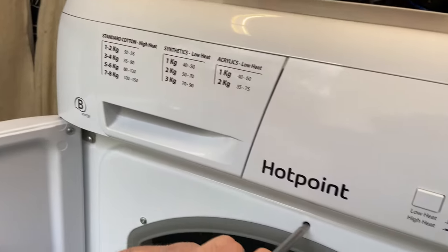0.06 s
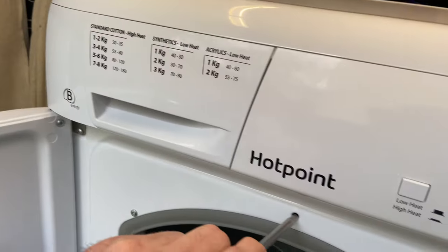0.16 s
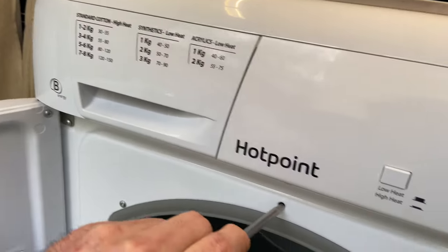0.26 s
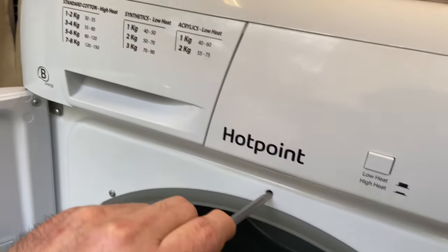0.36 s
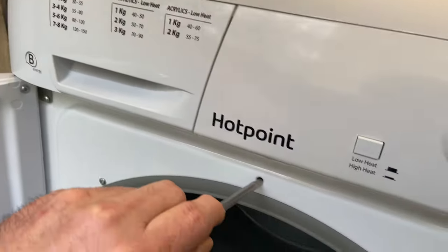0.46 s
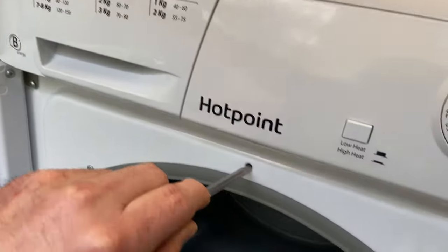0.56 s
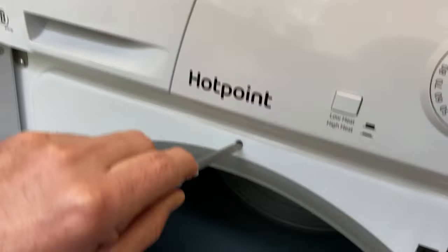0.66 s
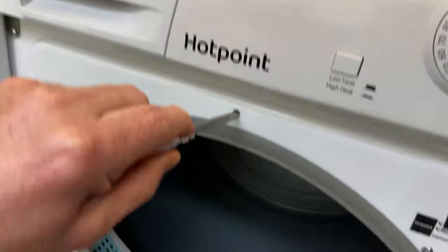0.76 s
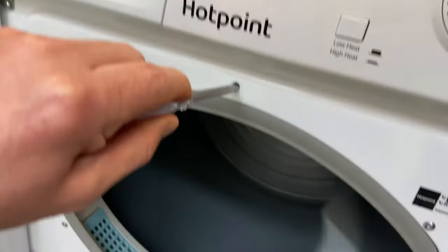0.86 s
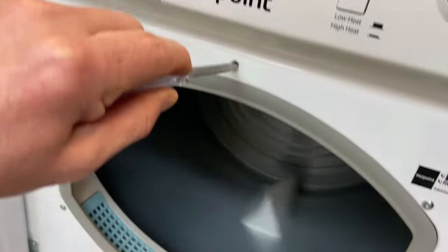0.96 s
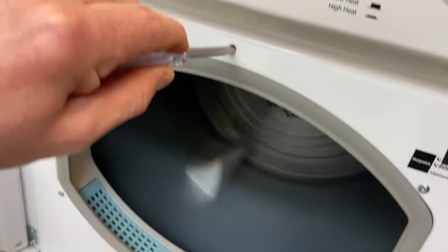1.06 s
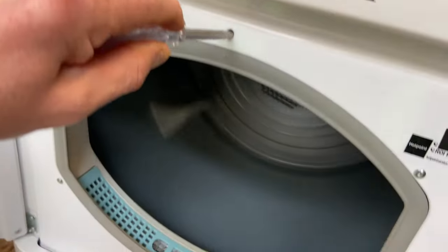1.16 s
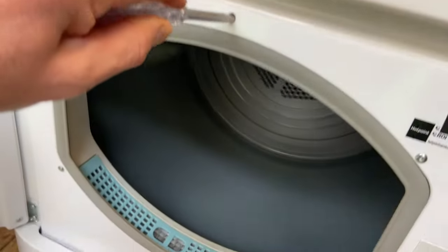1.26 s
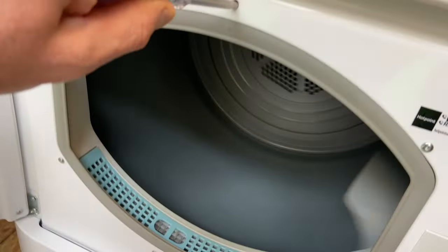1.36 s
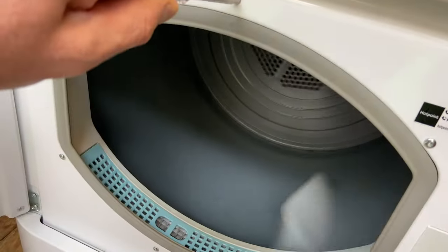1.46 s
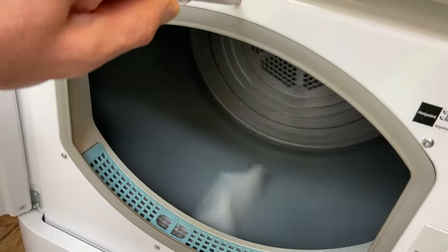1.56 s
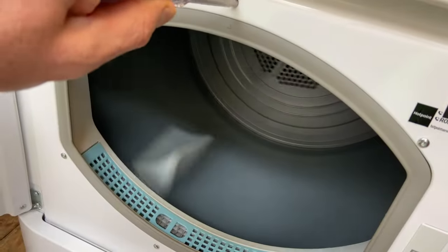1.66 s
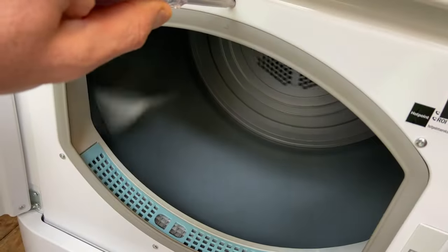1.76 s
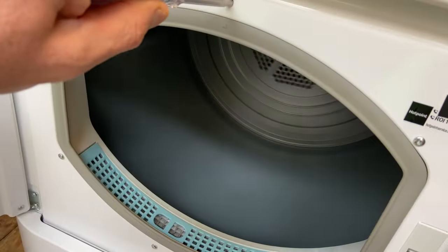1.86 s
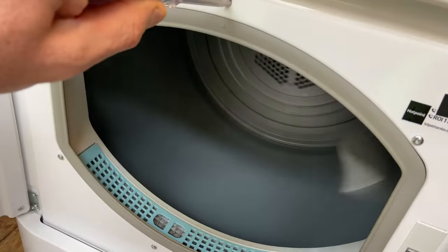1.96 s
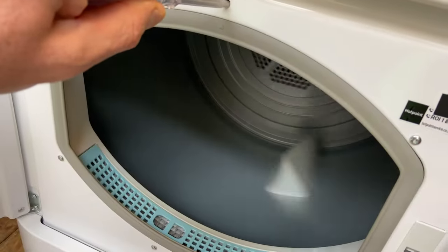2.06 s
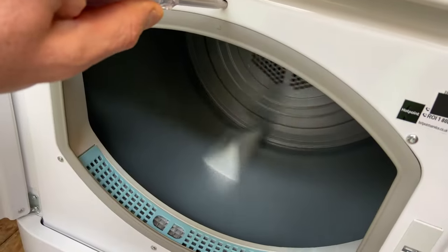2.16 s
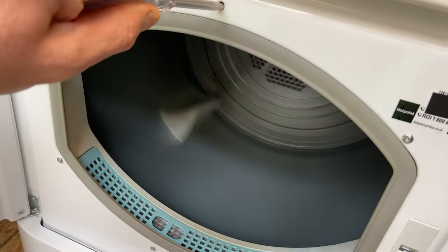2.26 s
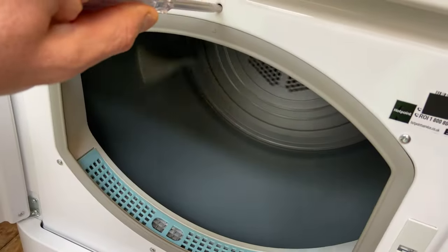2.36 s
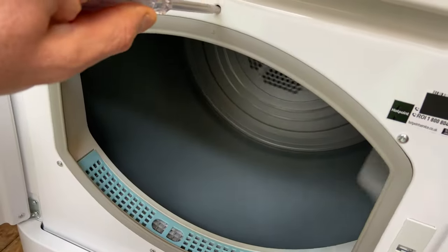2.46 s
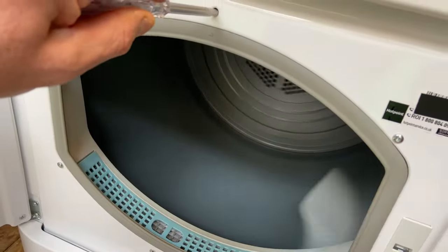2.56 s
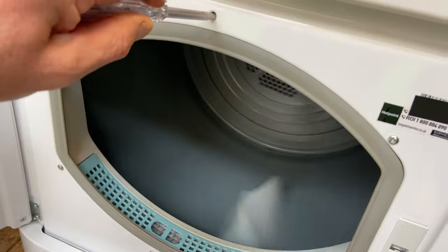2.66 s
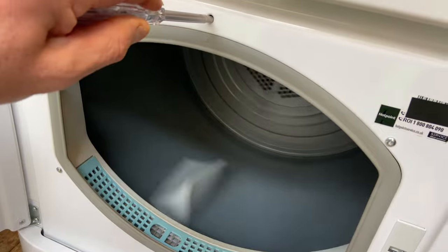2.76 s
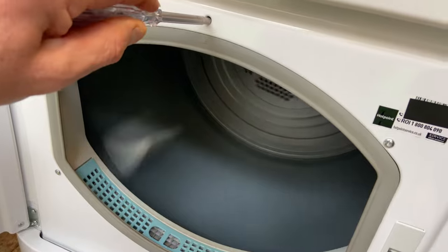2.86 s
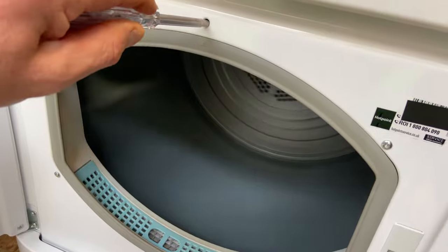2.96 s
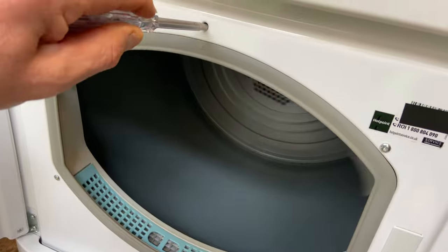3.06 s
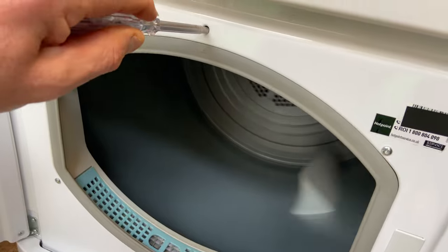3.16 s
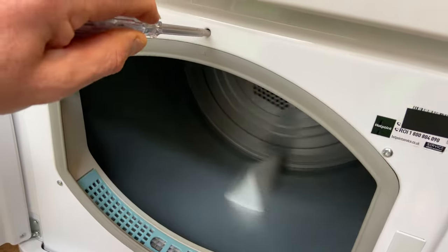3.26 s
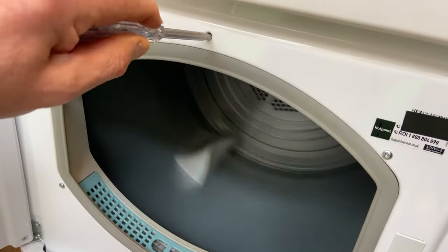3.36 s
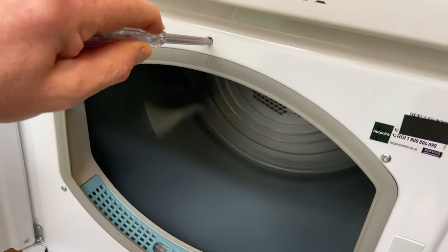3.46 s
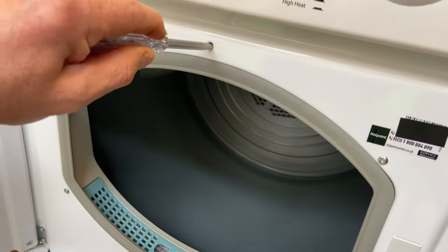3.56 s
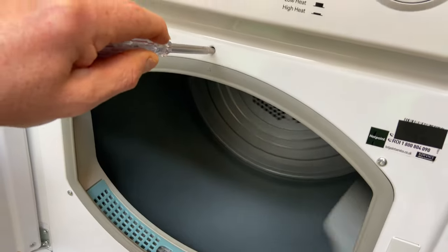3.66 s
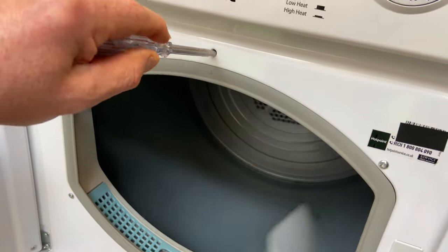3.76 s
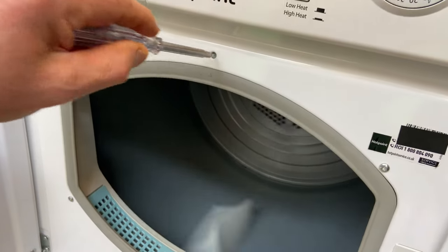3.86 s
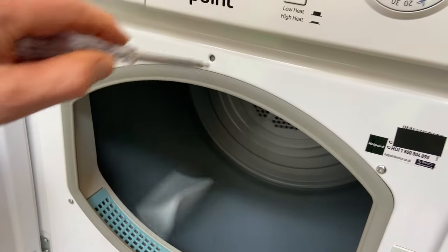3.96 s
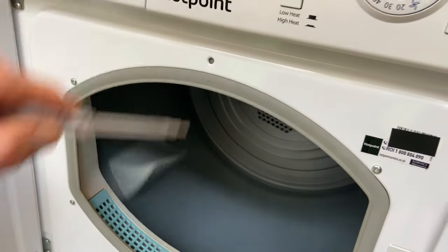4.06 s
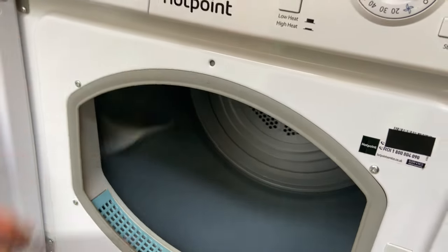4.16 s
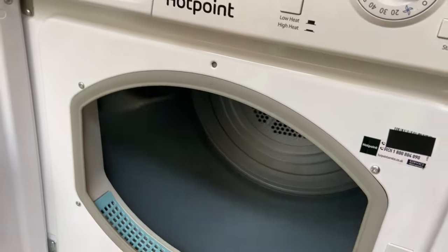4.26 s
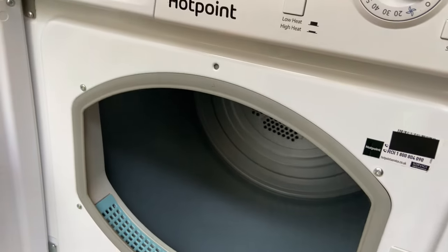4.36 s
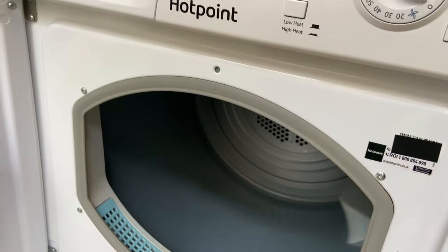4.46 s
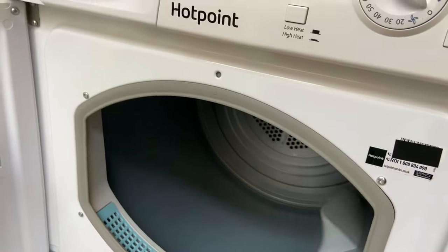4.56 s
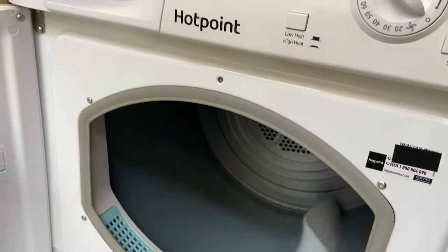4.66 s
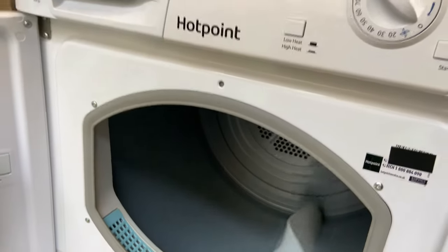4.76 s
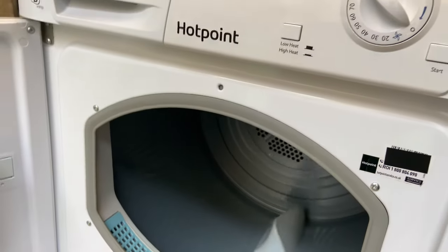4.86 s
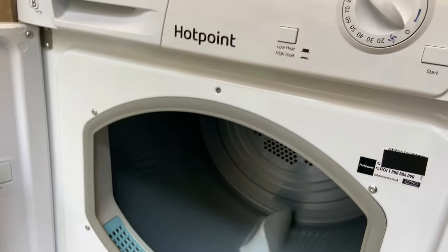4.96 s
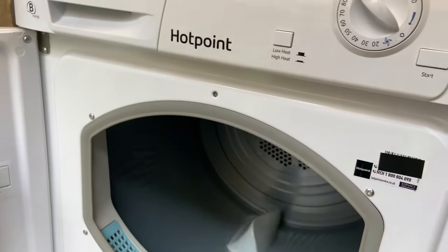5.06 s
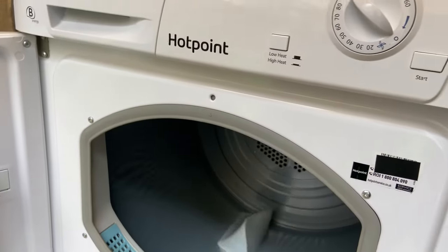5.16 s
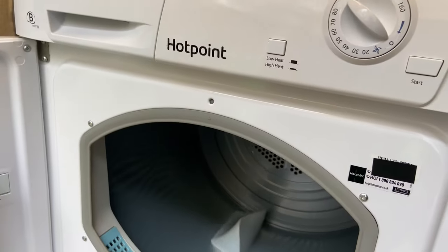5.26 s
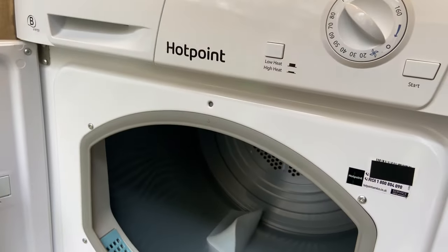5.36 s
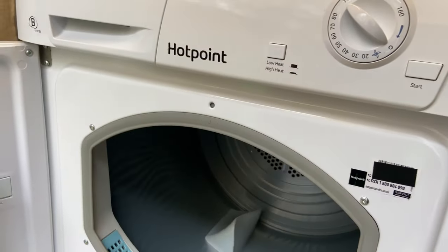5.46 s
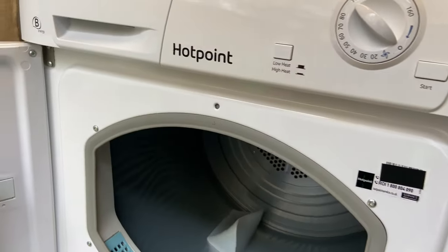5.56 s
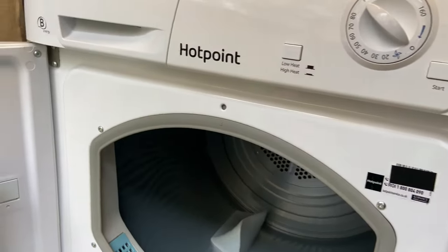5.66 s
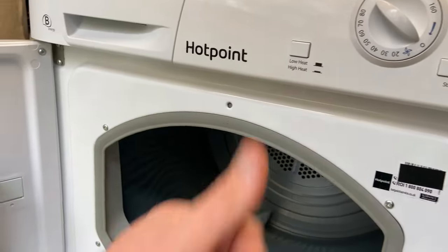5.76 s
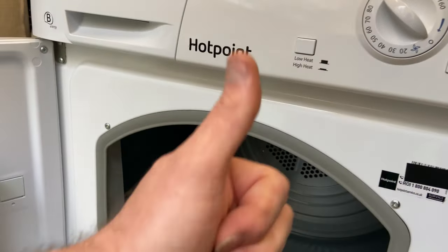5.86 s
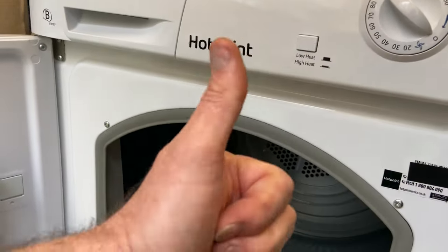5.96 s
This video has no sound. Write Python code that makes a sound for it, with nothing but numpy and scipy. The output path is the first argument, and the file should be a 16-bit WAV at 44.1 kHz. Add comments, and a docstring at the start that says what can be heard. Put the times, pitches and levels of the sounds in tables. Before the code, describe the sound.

Steady dryer drone with airy whoosh and drum rumble, a tiny squeak, a quick run-down, then a loud clack and rattling thuds into quiet.

```python
"""An empty tumble dryer runs with its door open, the door switch held in by a screwdriver, in a small room.
The motor hums, its fan drives air through the drum, and the drum rumbles and rubs on its seals.
The microphone pair moves from the control panel to the door. The screwdriver squeaks off and all coasts down;
a sharp clack, likely the motor's centrifugal switch, shakes the cabinet, with knocks and low bumps as the drum
settles. Sources are modulated sines, shaped noise and struck resonances over a quiet room tone."""
import sys
import numpy as np
from scipy import signal
from scipy.fft import rfft, irfft
from scipy.io import wavfile

SR = 44100
rng = np.random.default_rng(int(sys.argv[2]) if len(sys.argv) > 2 else 0)


def to_wav(s):
    """Save 16-bit WAV."""
    ch = np.atleast_2d(s).T  # columns
    pcm = np.round(np.clip(ch, -1, 1) * 32767)  # PCM
    wavfile.write(sys.argv[1], SR, pcm.astype(np.int16))


N = 264600
TIME = np.arange(N) / SR
BINS = np.maximum(np.fft.rfftfreq(N, 1 / SR), 1)
LEFT_RIGHT = np.array([[.5], [-.5]])  # times a difference in dB, splits it between the channels

# quiet room, spectrum: pitch_hz, density_db [dB per Hz]
ROOM_TONE_SPECTRUM = [(20, -3.5), (35, 1), (55, 5.5), (85, -3.5), (140, -6), (220, -8.5), (300, -19),
                      (480, -24), (1050, -26.5), (2000, -38.5), (4000, -56.5), (16000, -68)]
# likeness of the two microphone channels: pitch_hz, likeness [0-1]
CHANNEL_LIKENESS = [(60, 0.9), (130, 0.99), (290, 0.8), (640, 0.66), (1410, 0.55), (3100, 0.44),
                    (4400, 0.58), (5600, .1), (7000, 0.17)]
# low bumps: a deep thud as the machine slows, then swells as the drum rocks to rest: start_s, level_db,
# pitch_hz
LOW_BUMPS = [(4.612, -36.5, 76), (5.105, -49, 185), (5.14, -50, 183), (5.19, -42.5, 179.5),
             (5.425, -43.5, 181), (5.637, -42, 180), (5.828, -44, 186.5)]
# knocks on the cabinet: start_s, level_db, pitch_hz [of the push]
CABINET_KNOCKS = [(4.7218, -17.5, 397), (4.724, -10.5, 236), (4.7403, -20, 275), (4.748, -22, 260),
                  (4.76, -29, 260), (4.8134, -11.5, 219), (4.834, -32, 270), (4.851, -19, 193),
                  (4.876, -24.5, 152), (4.921, -25.5, 205), (4.941, -30, 190), (4.9842, -37, 250),
                  (4.9878, -25.5, 204), (5.003, -31, 230), (5.011, -30, 232), (5.0462, -27, 222),
                  (5.066, -36, 245), (5.075, -36, 215)]
# cabinet panel modes: pitch_hz, level_db, t60_s
PANEL_MODES = [(128, -20, .13), (165, -16.5, .15), (197, -23, .13), (250, -15, .165), (404, -1, .11),
               (440, -8, .08), (515, -20, .08), (560, -21, .08), (685, -20, .09)]
# touches of a loose spring: start_s, level_db
SPRING_JOLTS = [(4.728, -57), (4.815, -55), (4.827, -55), (4.926, -59), (4.932, -58), (4.94, -60)]
# loose spring modes: pitch_hz, level_db, t60_s
SPRING_MODES = [(3704, -4, .07), (3880, -5, .06), (4260, -7, .05), (4960, 1, .1), (5080, -4, .07),
                (7340, -11, .07), (7600, -7, .07), (9555, -8, .06), (11860, -10, .05), (14200, -9, .04),
                (15050, -7, .06)]
# hard metal contacts: start_s, ring_db, crack_db, edge_hz [upper edge of the crack]
METAL_CONTACTS = [(3.8089, -67, -22, 12000), (4.72, -46, -23.5, 15300), (4.7207, -20.5, -24, 6000),
                  (4.7256, -32, -27, 4000), (4.734, -49, -33, 2500), (4.7455, -55, -37, 2500),
                  (4.766, -48, -42, 2500), (4.8093, -52, -28, 4000), (4.8125, -54, -37, 4000),
                  (4.8463, -70, -31, 5500), (4.9215, -58, -55, 1490), (4.981, -70, -45, 4000),
                  (4.9865, -80, -38.5, 9000), (5.044, -55, -41, 1200)]
# metal crack, spectrum: pitch_hz, density_db [dB per Hz]
CRACK_SPECTRUM = [(150, 4), (500, 9), (750, 7), (1100, 17.5), (1500, 6), (2300, 15), (2900, 0.5),
                  (3400, 5.5), (4400, 6), (5600, 1.5), (6300, -9), (7400, 3.5), (8600, -4), (10000, 7),
                  (12000, -8), (15500, 2)]
# switch and bracket modes: pitch_hz, level_db, t60_s
BRACKET_MODES = [(700, -28, .05), (942, -11, .045), (1000, -3.5, .032), (1066, -15, .045), (1140, -1, .026),
                 (1265, -9, .023), (1480, -21, .04), (1803, -23, .06), (2062, -21, .07), (2170, -23, .05),
                 (2283, -17, .09), (2400, -24, .05), (2580, -24, .06), (3300, -27, .04), (4091, -28, .06),
                 (4750, -29, .04), (5560, -26, .04)]
# small hard part's modes: pitch_hz, level_db, t60_s
TICK_MODES = [(1560, 1, 0.031), (1690, 2, .025), (1810, 0, .03), (2270, -8, .06), (2525, -17, .06)]
# dry brushing, spectrum: pitch_hz, density_db [dB per Hz]
BRUSH_SPECTRUM = [(600, -17), (1600, 7.5), (2800, 4.5), (4400, 3), (5800, -4), (7400, -4.5), (11000, -11),
                  (15500, -12)]
# drum on its bearings, spectrum: pitch_hz, density_db [dB per Hz]
RUMBLE_SPECTRUM = [(20, -41), (36, -23), (48, -6.5), (66, -8.5), (80, 1.5), (105, -1.5), (145, 2),
                   (185, -3.5), (215, -7.5), (265, -8), (310, -13), (600, -48.5)]
# air rush, spectrum: pitch_hz, density_db [dB per Hz]
AIR_SPECTRUM = [(120, -34), (240, -7.5), (340, 0), (450, 0), (700, -2), (920, -5), (1250, -8),
                (1700, -11.5), (2300, -17.5), (3200, -21.5), (6000, -50), (16000, -65)]
# rubbing of seals and other dry contacts, spectrum: pitch_hz, density_db [dB per Hz]
RUB_SPECTRUM = [(400, -26), (1500, 2), (2500, 1.5), (3200, 4), (4400, 2), (5800, -4), (7000, -1),
                (8300, -6), (11000, -7.5), (15500, -14)]
# resonances and hollows of drum and air duct: pitch_hz, width_hz, level_db, left_minus_right_db
DUCT_RESONANCES = [(308, 17, -12.5, 4), (357, 78, 2, 1), (493.7, 54, -9.5, -10.5), (534, 55, 1.5, 10),
                   (609, 86, -3, -6.5), (716, 39, -6, 13.5), (784, 104, 2, 2.5), (900, 150, 2, 1.5),
                   (998, 70, -8.5, 0), (1088, 63, 3, 2.5), (1297, 100, -4.5, 3), (1434, 125, 3.5, -2.5),
                   (1996, 40, 4.5, 7), (2030, 57, -1, -4), (2260, 74, -0.5, 17), (2825, 54, 1, 12.5)]
# high spots of the drum's rim: first_pass_s, length_s, added_db
RIM_HIGH_SPOTS = [(0.287, 0.044, 2.5), (0.52, 0.0076, 4), (.85, 0.11, 0.9)]
# motor and fan orders: order [multiple of the shaft rate], level_db, roughness [0-1]
SHAFT_ORDERS = [(1, -47.5, .4), (2, -25.4, 0.05), (12, -52, .6), (17, -46.5, .6), (18, -48, .5),
                (19, -51, .5), (20, -48.5, .5), (24, -44, 0.6), (30, -53.5, .5), (31, -51.5, .5),
                (32, -53, .5), (33, -53, .5)]

# steady shaft rate, moment the door switch opens, length of the coast to rest
SHAFT_HZ, SWITCH_OFF_S, COAST_S = 45.24, 3.8, 1.69
FIELD_DECAY_S = 0.04  # the motor's magnetic pull dies away once the current is cut
APPROACH_S = 0.95  # the microphone's move from the control panel to the open door
DRUM_TURN_S = 1.14  # at full speed
SLACK_DB = -1.5  # drop of rush and rubbing when the belt stops pulling
RIPPLE_DB = 1.7


def from_db(db):
    """Decibels to gain."""
    return 10 ** (np.asarray(db) / 20)


def rms_one(x):
    """Scale so that the middle of the stereo picture has rms 1."""
    middle = np.atleast_2d(x).mean(0)
    return x / np.sqrt(np.mean(middle ** 2) + 1e-20)


def over_hz(points):
    """Join (Hz, value) points on a log-frequency axis."""
    hz, value = np.transpose(points)
    return np.interp(np.log(BINS), np.log(hz), value)


def drift(rate_hz):
    """Slow random wander of rms 1, changing about rate_hz times a second."""
    spectrum = rfft(rng.standard_normal(N))
    return rms_one(irfft(spectrum / (1 + (BINS / rate_hz) ** 2) ** 1.5, N))


def noise(colour_db):
    """Coloured stereo noise, more alike in the bass and more diffuse in the treble; its middle has rms 1."""
    mid, side = rfft(rng.standard_normal((2, N)))
    alike = np.clip(over_hz(CHANNEL_LIKENESS), 0, .999)
    pair = mid + np.sqrt((1 - alike) / (1 + alike)) * side * 2 * LEFT_RIGHT
    return rms_one(irfft(pair * from_db(colour_db), N))


def clicks(times_s, levels_db):
    """One impulse at each time."""
    out = np.zeros(N)
    out[np.round(np.asarray(times_s) * SR).astype(int)] = from_db(levels_db)
    return out


def ring(force, modes):
    """A unit impulse sets every (Hz, dB, t60) mode ringing, with alternating signs."""
    t = TIME[:SR // 2]
    response = np.zeros(len(t))
    for k, (hz, level_db, t60) in enumerate(modes):
        response += (-1) ** k * from_db(level_db - 60 * t / t60) * np.sin(2 * np.pi * hz * t)
    return signal.fftconvolve(force, response)[:N]


def speed():
    """Share of full speed: 1 under power, then friction brakes it evenly to 0."""
    return np.clip(1 - (TIME - SWITCH_OFF_S) / COAST_S, 0, 1)


def pull():
    """Share of the motor's magnetic pull: 1 under current, dying quickly after the switch opens."""
    return np.exp(-np.maximum(TIME - SWITCH_OFF_S, 0) / FIELD_DECAY_S)


def shade(level_db):
    """Gain that starts at level_db and rises to 0 dB as the microphone reaches the door."""
    return from_db(level_db * np.clip(1 - TIME / APPROACH_S, 0, 1))


def run_down(power, drag_db, drag_power=0.74):
    """Gain of a noise driven by the speed: a steep part and a light drag that lasts until standstill."""
    return np.hypot(speed() ** power, from_db(drag_db) * speed() ** drag_power)


def ripple(spacing_hz):
    """Many overlapping modes ripple the upper spectrum, differently in each channel; in dB."""
    knots_hz = np.arange(2000) * spacing_hz
    rows = rng.standard_normal((2, len(knots_hz)))
    heights = np.array([np.interp(BINS, knots_hz, row) for row in rows])
    return RIPPLE_DB * heights * over_hz([(1000, 0), (2000, 1)])


def room_tone(level_db=-48, right_minus_left_db=1.0):
    """The quiet room is a steady noise, strongest in the bass."""
    return from_db(level_db - right_minus_left_db * LEFT_RIGHT) * noise(over_hz(ROOM_TONE_SPECTRUM))


def reflections(x, t60_s=0.2, onset_s=0.0043):
    """Dense reflections from the drum and the near walls, building up and dying away."""
    t = TIME[:SR // 2]
    white = noise(0 * BINS)[:, :len(t)]
    tail = white * from_db(-60 * t / t60_s) * (1 - np.exp(-t / onset_s))
    tail /= np.sqrt(np.sum(tail.mean(0) ** 2))
    return signal.fftconvolve(x, tail, axes=1)[:, :N]


def low_bumps(rise_s=.023, tail_db=-17, tail_s=.12):
    """Dull swells, each of one low note that lingers faintly: a deep thud as the machine slows, then the drum
    rocking to rest."""
    out = np.zeros(N)
    for start_s, level_db, hz in LOW_BUMPS:
        t = np.maximum(TIME - start_s, 0)
        age = t / rise_s
        swell = age ** 2 * np.exp(2 - 2 * age)
        lingering = from_db(tail_db) * (1 - np.exp(-age)) * np.exp(-t / tail_s)
        out += from_db(level_db) * (swell + lingering) * np.sin(2 * np.pi * hz * t)
    return out


def cabinet_knocks(cycles=0.44, sag=0.082, panel_db=-42):
    """Each knock flexes the cabinet for two or three cycles and leaves its panels ringing."""
    flex = np.zeros(N)
    for start_s, level_db, hz in CABINET_KNOCKS:
        # bending waves carry the higher pitches faster, so the thud sags in pitch
        phase = np.log1p(sag * hz * np.clip(TIME - start_s, 0, 1)) / sag
        age = phase / (2 * cycles)
        push = age ** 2 * np.exp(2 - 2 * age)
        flex -= from_db(level_db) * push * np.sin(2 * np.pi * phase)
    # the panels are too small to radiate deep bass
    radiated = signal.sosfilt(signal.butter(2, 70, "high", fs=SR, output="sos"), flex)
    return radiated + from_db(panel_db) * ring(flex, PANEL_MODES)


def loose_spring(scrape_db=4, scrape_s=0.0046):
    """The harder knocks jolt a loose spring: each touch scrapes briefly and sets it ringing."""
    jolts = clicks(*np.transpose(SPRING_JOLTS))
    contact = signal.lfilter([1], [1, -np.exp(-1 / (scrape_s * SR))], jolts)
    scrape = from_db(scrape_db) * contact * noise(over_hz(RUB_SPECTRUM))
    return ring(jolts, SPRING_MODES) + scrape


def screwdriver_squeak(start_s=3.745, length_s=0.067, edge_s=0.0084, pitch_hz=2440, waver_hz=70):
    """Sliding off the switch, steel sticks and slips on plastic: a short unsteady note and a scrape."""
    phase = 2 * np.pi * np.cumsum(pitch_hz + waver_hz * drift(137)) / SR
    to_nearest_end = np.minimum(TIME - start_s, start_s + length_s - TIME)
    sliding = np.clip(to_nearest_end / edge_s, 0, 1)
    note = from_db(-43) * np.sin(phase)
    scrape = from_db(-41.5) * noise(over_hz(RUB_SPECTRUM))
    return sliding * (note + scrape)


def metal_clacks(crack_s=0.0029, tail_db=-15, tail_s=0.0087, tick_s=4.9865, tick_db=-45.5):
    """Metal snaps on metal: a crack with a rattling tail, duller if softer; bracket and a small part ring."""
    grit = noise(over_hz(CRACK_SPECTRUM)) * from_db(-5.5 + 5.5 * LEFT_RIGHT)
    t = TIME[:SR // 5]
    decay = np.exp(-t / crack_s) + from_db(tail_db) * np.exp(-t / tail_s)
    cracks = np.zeros((2, N))
    for start_s, _, crack_db, edge_hz in METAL_CONTACTS:
        at = round(start_s * SR)
        burst = grit[:, at:at + len(t)] * decay
        dulled = signal.lfilter(*signal.butter(1, edge_hz, fs=SR), burst)
        cracks[:, at:at + len(t)] += from_db(crack_db) * dulled
    times_s, ring_db = np.transpose(METAL_CONTACTS)[:2]
    bracket = ring(clicks(times_s, ring_db), BRACKET_MODES)
    # the small part ticks with one of the last knocks
    tick = ring(clicks([tick_s], [tick_db]), TICK_MODES)
    return cracks + bracket + tick


def brushing(level_db=-58, growth_s=1.0, stop_s=4.76):
    """A dry brushing, likely the centrifugal switch's collar, grows as the shaft slows, then stops dead."""
    contact = np.clip((TIME - SWITCH_OFF_S) / growth_s, 0, 1) * (TIME <= stop_s)
    colour_db = over_hz(BRUSH_SPECTRUM) + ripple(spacing_hz=61.4)
    return contact * from_db(level_db + drift(30)) * noise(colour_db)


def seal_pressure_db():
    """The rubbing swells as each high spot of the rim comes round, and eases when the belt goes slack."""
    travel_s = np.cumsum(speed()) / SR  # drum travel, as seconds at full speed
    pressure_db = SLACK_DB * (1 - pull())
    for first_pass_s, length_s, added_db in RIM_HIGH_SPOTS:
        half_turn = DRUM_TURN_S / 2
        from_spot_s = (travel_s - first_pass_s + half_turn) % DRUM_TURN_S - half_turn
        pressure_db = pressure_db + added_db * np.exp(-(from_spot_s / length_s) ** 2)
    return pressure_db


def drum_and_fan(rumble_db=-29.5, air_db=-30, seal_db=-42.5):
    """The drum rumbles on its bearings, air rushes through the duct's resonances, and the seals rub."""
    drum_db = ripple(spacing_hz=44.97)
    duct_db = 0
    for hz, width_hz, level_db, pan_db in DUCT_RESONANCES:
        shape = 2 ** -((2 * (BINS - hz) / width_hz) ** 2)
        duct_db = duct_db + (level_db + pan_db * LEFT_RIGHT) * shape

    # all three flicker in level and fall steeply with speed
    rumble_level = from_db(rumble_db + 1.2 * drift(13)) * run_down(4.6, drag_db=-22)
    rumble = noise(over_hz(RUMBLE_SPECTRUM)) * rumble_level

    air_level = from_db(air_db + SLACK_DB * (1 - pull()) + 0.5 * drift(37.6)) * run_down(4.54, drag_db=-17)
    air = noise(over_hz(AIR_SPECTRUM) + duct_db + drum_db) * air_level

    seal_level = from_db(seal_db + seal_pressure_db() + 0.96 * drift(18)) * run_down(5.6, drag_db=-12)
    seals = noise(over_hz(RUB_SPECTRUM) + drum_db) * seal_level

    mix = rumble + air * from_db(0.76 * LEFT_RIGHT) + seals * from_db(3.5 * LEFT_RIGHT)
    return mix * shade(-1)


def motor(orders_db=-2, mains_db=-36.5, unbalance_db=-8.5, flutter_hz=7):
    """Two low shaft orders shake the cabinet, higher ones whirr in the fan; windings hum at twice mains rate."""
    shaft_phase = 2 * np.pi * SHAFT_HZ * np.cumsum(speed()) / SR
    field = pull()
    # without the magnetic pull only the unbalance of the shaft still shakes
    shaking = field + (1 - field) * from_db(unbalance_db) * speed() ** 5.4
    whirring = speed() ** 8.0
    tones = np.zeros(N)
    for order, level_db, rough in SHAFT_ORDERS:
        wander = drift(flutter_hz) + 1j * drift(flutter_hz)
        flutter = np.sqrt(2 - 2 * rough ** 2) + rough * wander
        tone = np.real(flutter * np.exp(1j * order * shaft_phase))
        tones += from_db(level_db) * (shaking if order <= 2 else whirring) * tone
    hum = np.sqrt(2) * np.sin(2 * np.pi * 100 * TIME)
    return (from_db(orders_db) * tones + from_db(mains_db) * field * hum) * shade(-5)


def scene():
    """The quiet room, the blows as the machine stops, and the running machine."""
    metal = screwdriver_squeak() + metal_clacks() + loose_spring()
    thuds = cabinet_knocks() + low_bumps()
    reflected = reflections(from_db(-8) * metal + from_db(-16) * thuds)
    machine = motor() * from_db(1.0 * LEFT_RIGHT) + drum_and_fan() + brushing()
    return room_tone() + reflected + thuds + metal + machine


def record(dry, crossover_hz=7100, treble_lag_s=1 / 4060):
    """The microphone pair shares one treble signal, late on the left; the deep bass and the top are cut."""
    left, right = rfft(dry)
    shared = over_hz([(crossover_hz - 1000, 0), (crossover_hz, 1)])
    late = right * np.exp(-2j * np.pi * (BINS - crossover_hz) * treble_lag_s)
    left = np.sqrt(1 - shared) * left + np.sqrt(shared) * late
    pair = irfft(np.array([left, right]), N)
    fade = np.clip(np.minimum(TIME, TIME[-1] - TIME) / .005, 0, 1) ** 2
    pair = signal.sosfilt(signal.butter(4, 34, "high", fs=SR, output="sos"), pair * fade)
    return signal.sosfilt(signal.ellip(10, .1, 80, 15900, fs=SR, output="sos"), pair)


dry = scene()
out = record(dry)
to_wav(out)
```